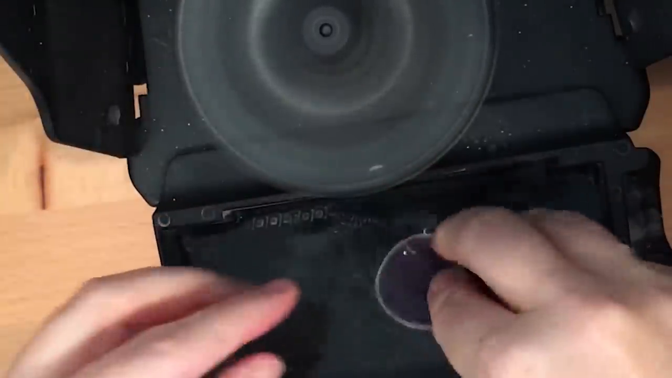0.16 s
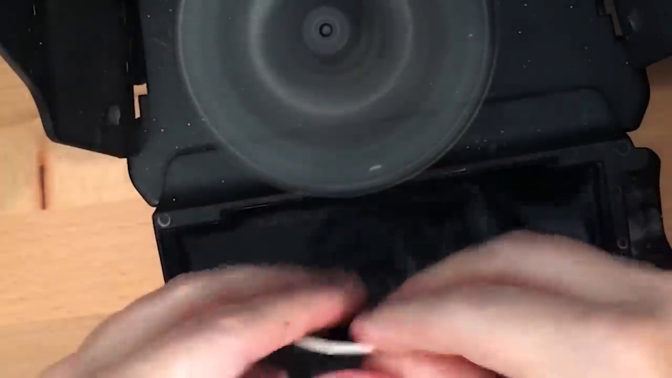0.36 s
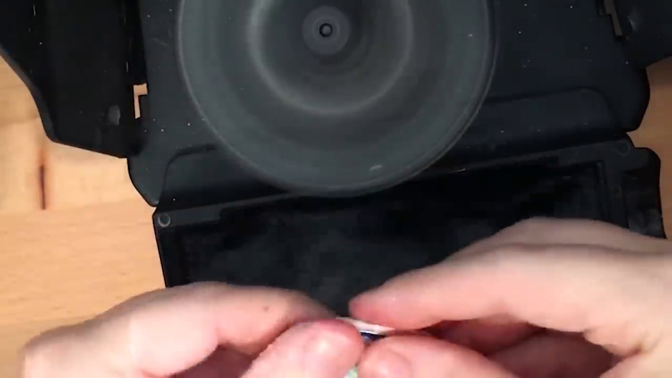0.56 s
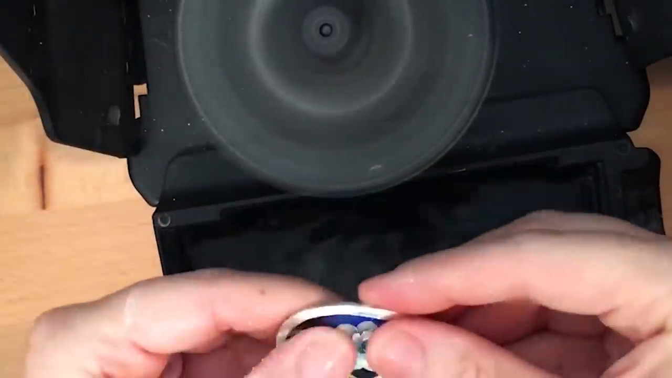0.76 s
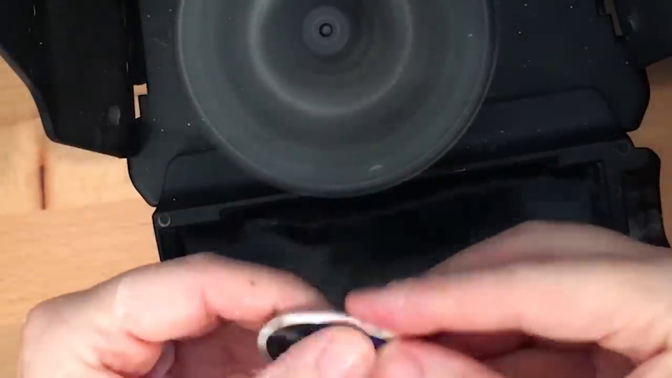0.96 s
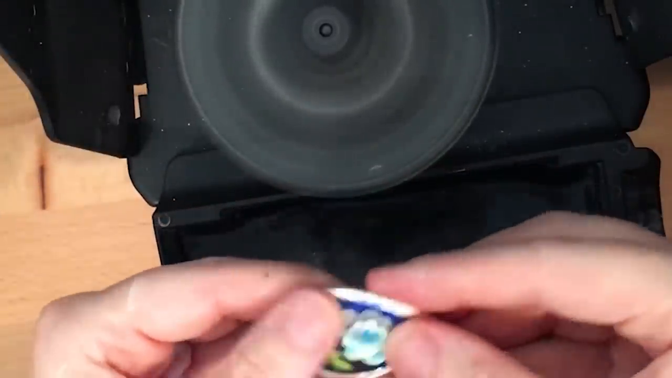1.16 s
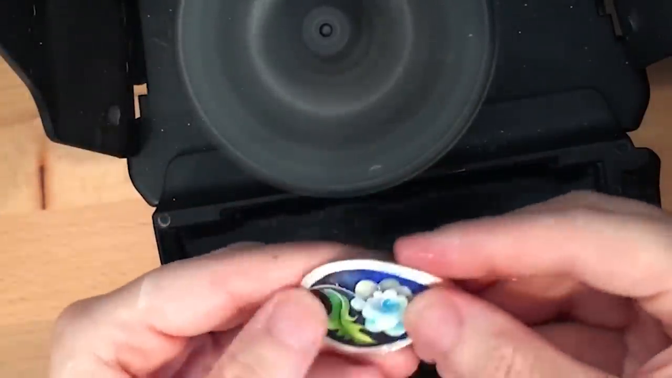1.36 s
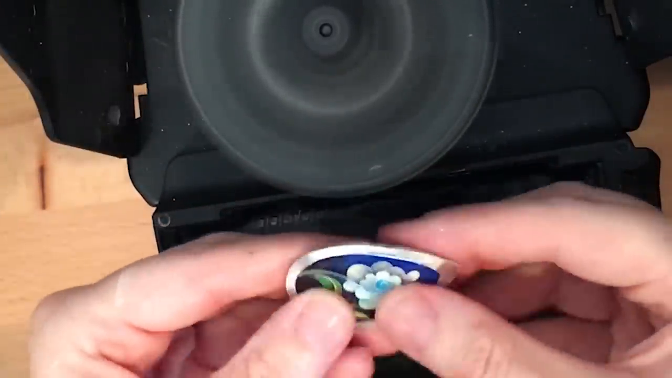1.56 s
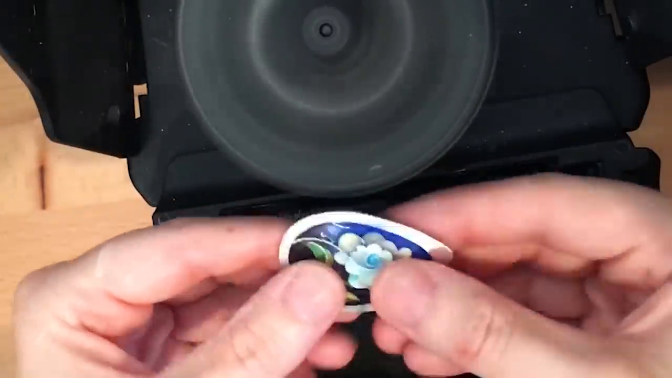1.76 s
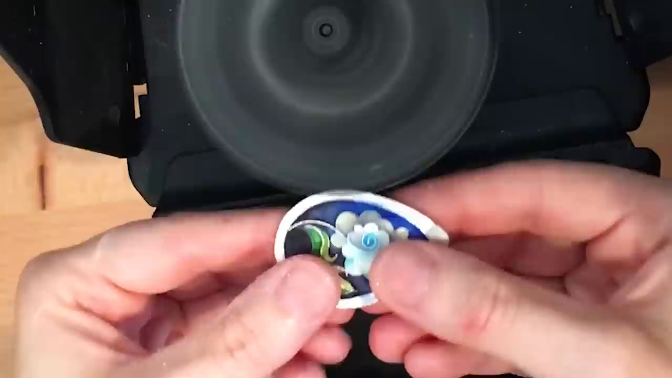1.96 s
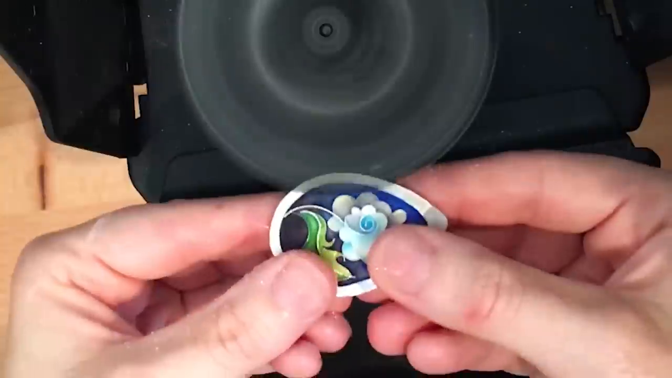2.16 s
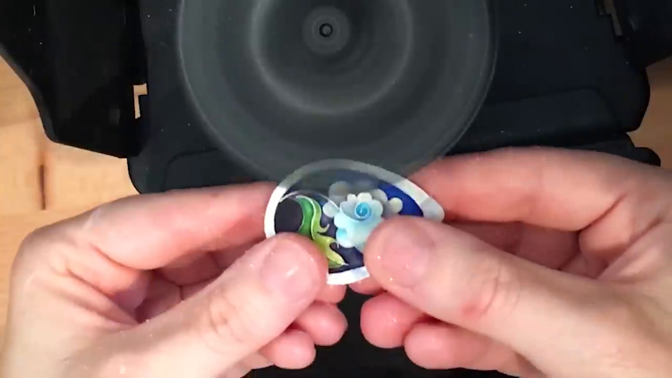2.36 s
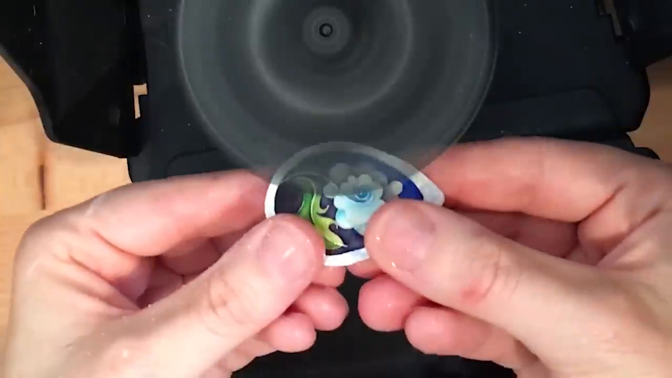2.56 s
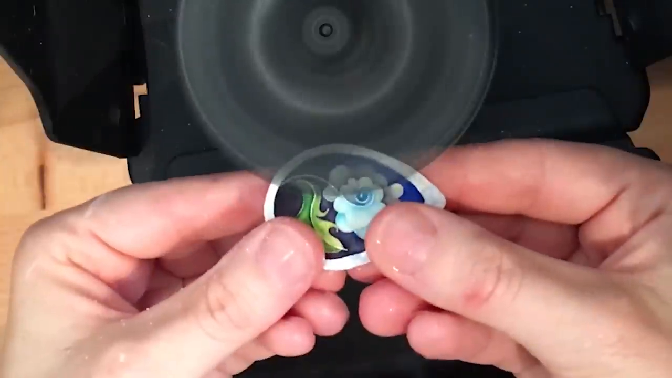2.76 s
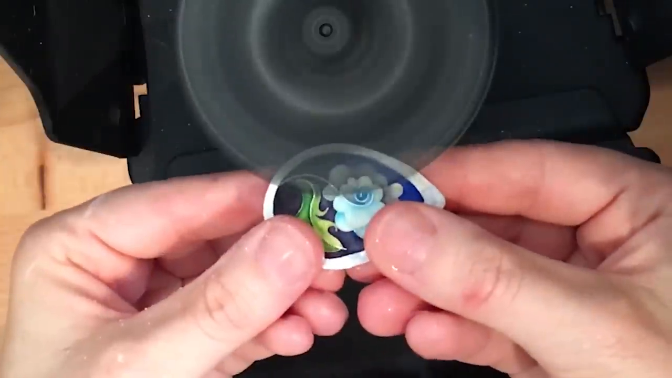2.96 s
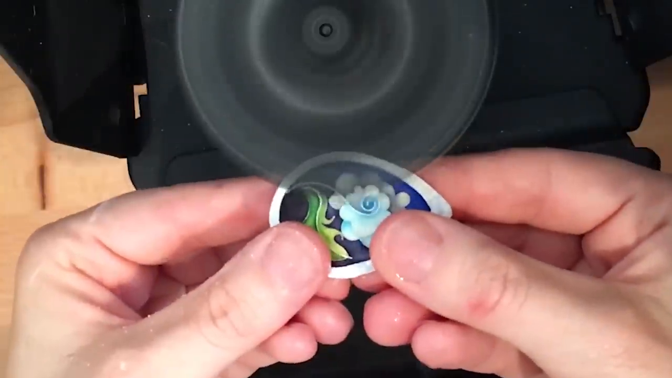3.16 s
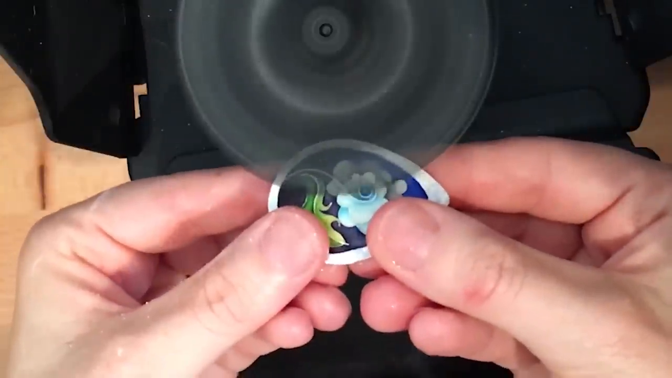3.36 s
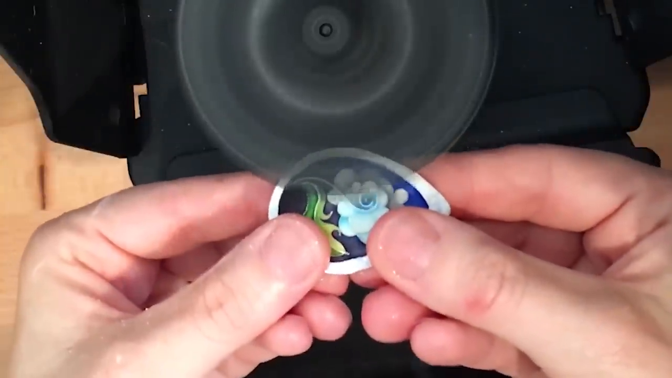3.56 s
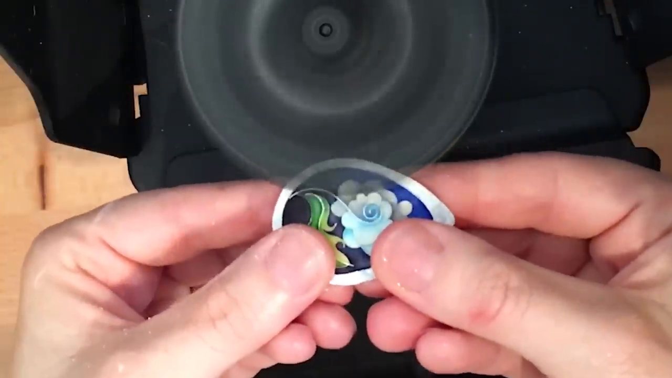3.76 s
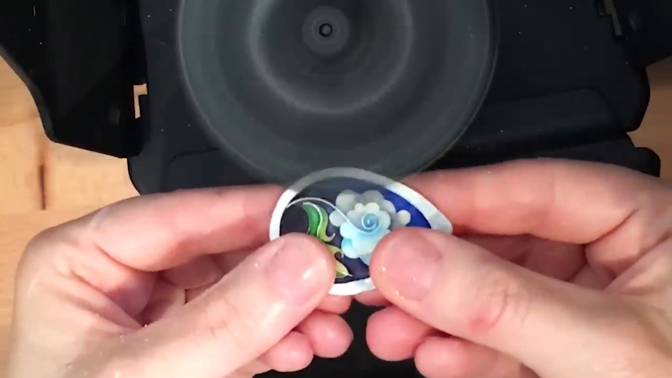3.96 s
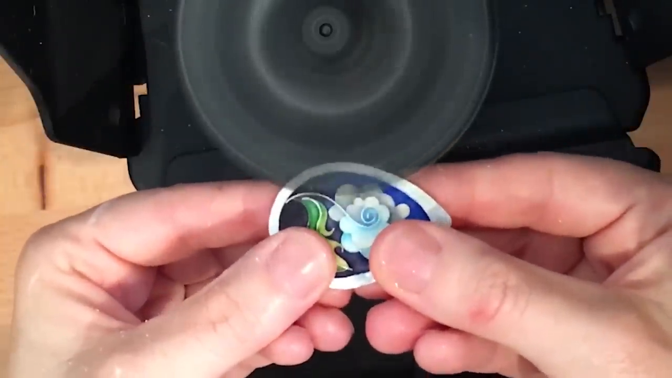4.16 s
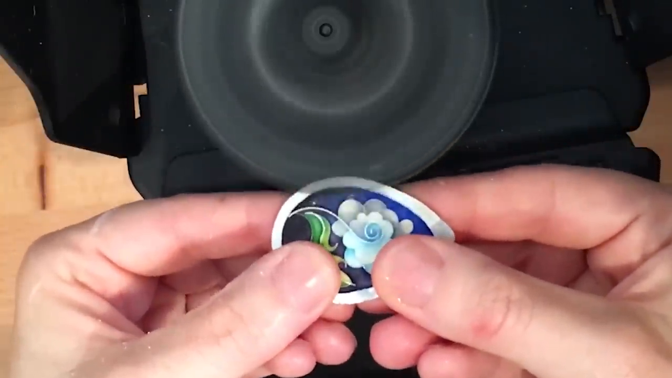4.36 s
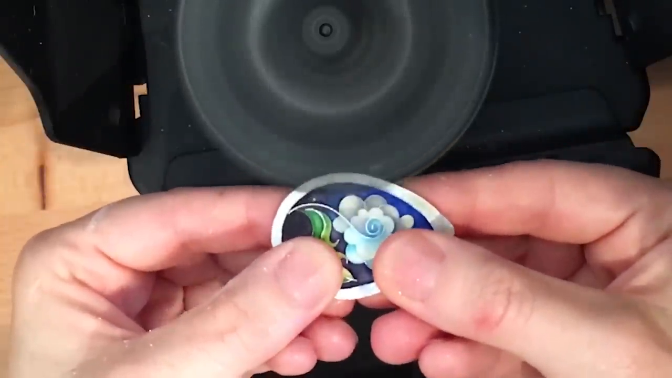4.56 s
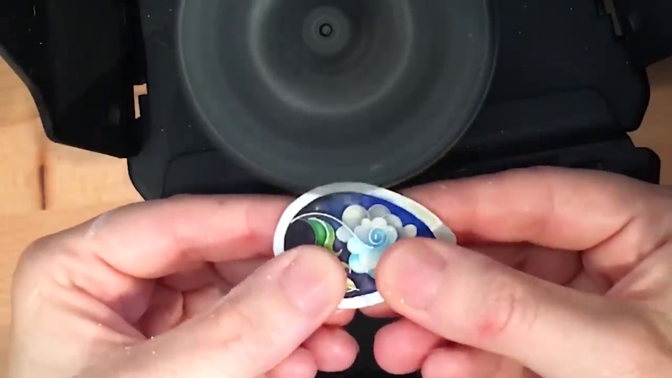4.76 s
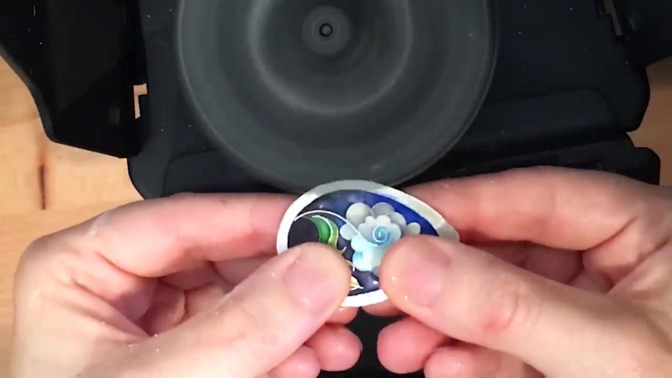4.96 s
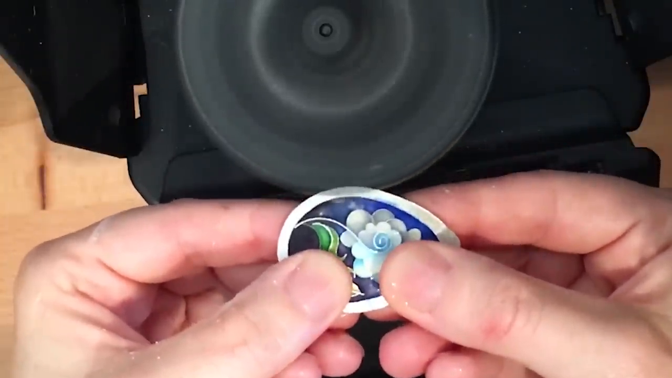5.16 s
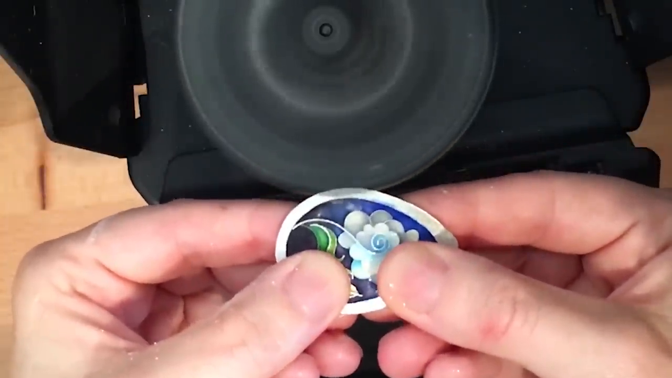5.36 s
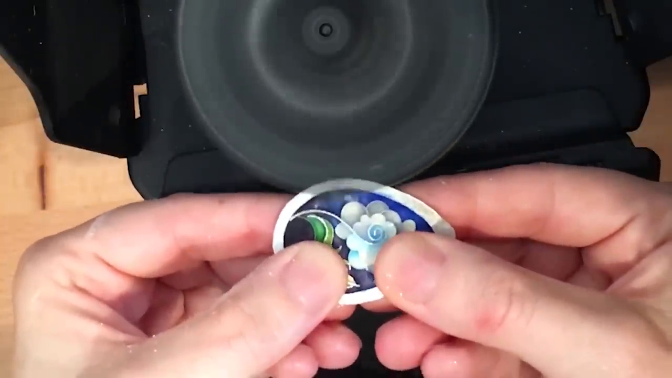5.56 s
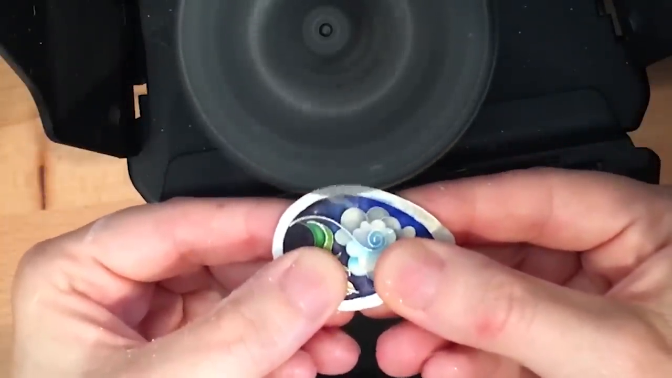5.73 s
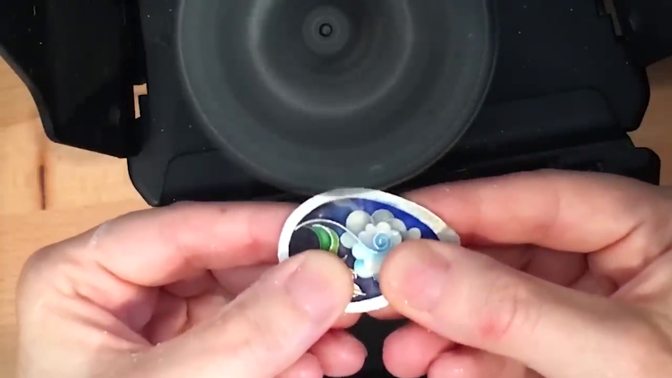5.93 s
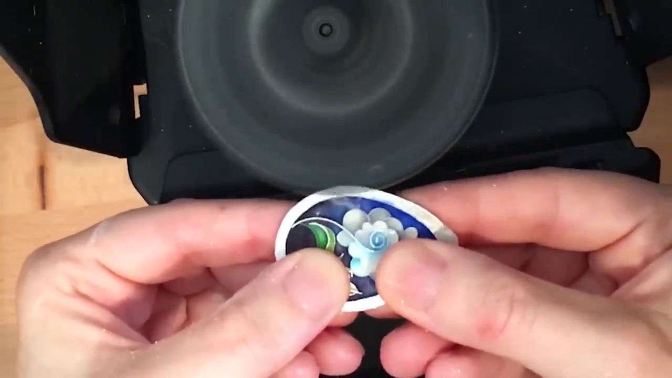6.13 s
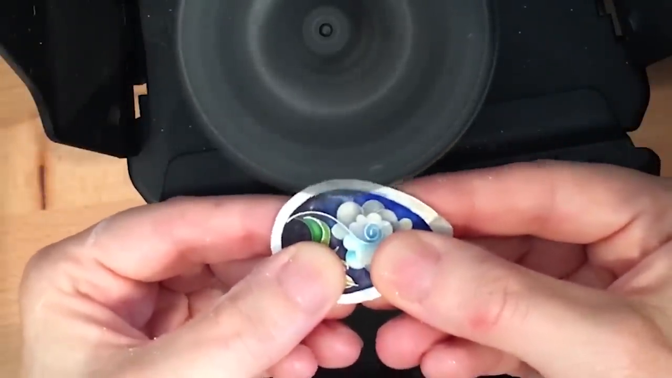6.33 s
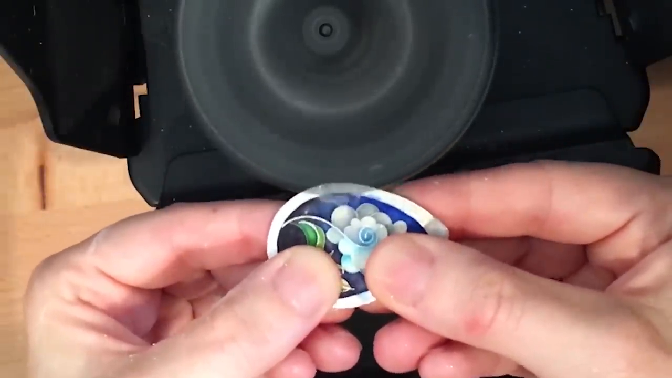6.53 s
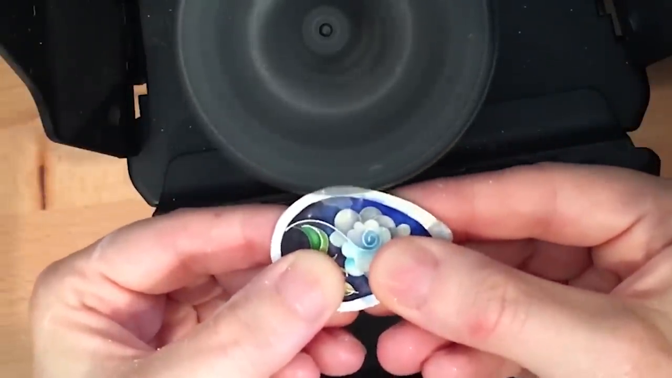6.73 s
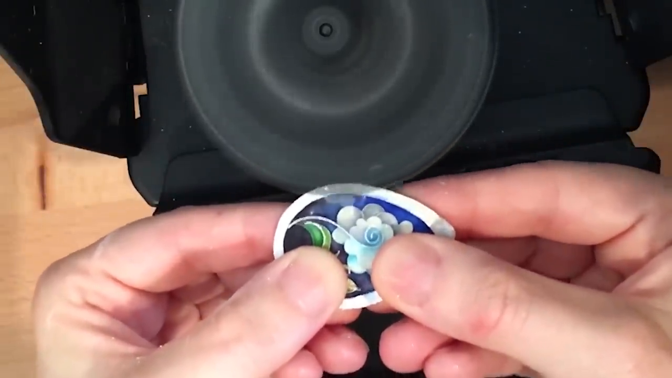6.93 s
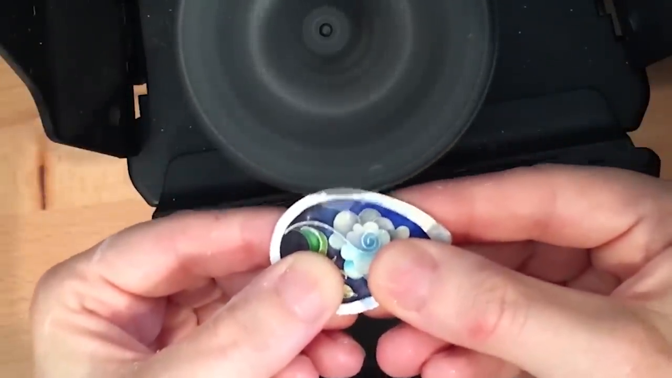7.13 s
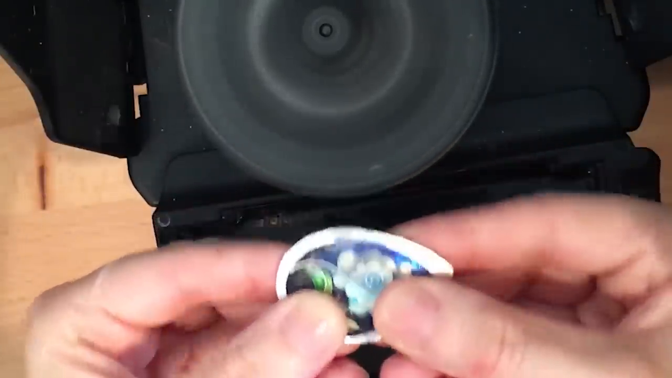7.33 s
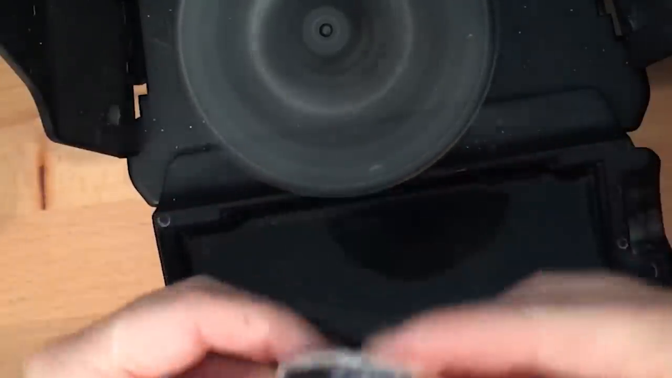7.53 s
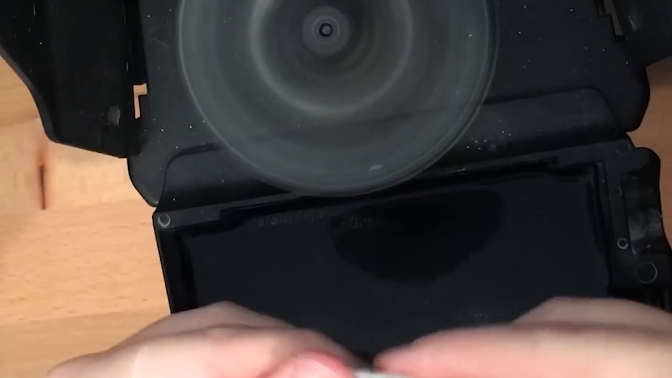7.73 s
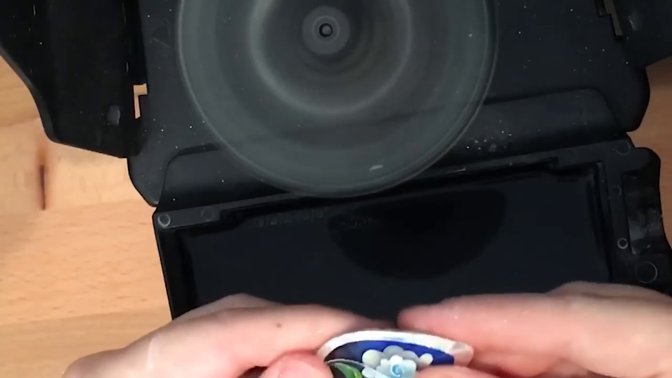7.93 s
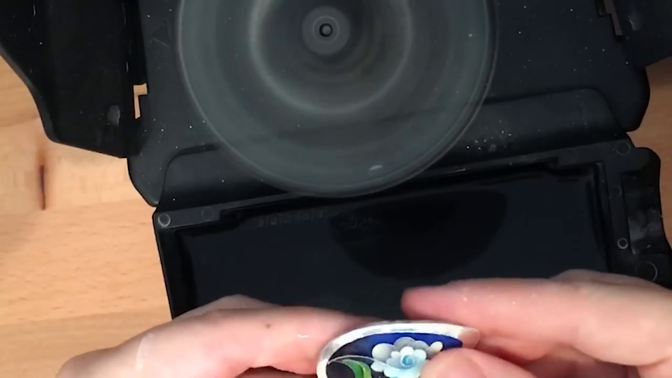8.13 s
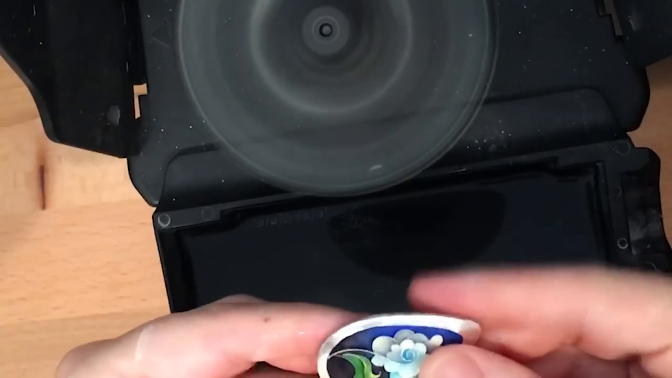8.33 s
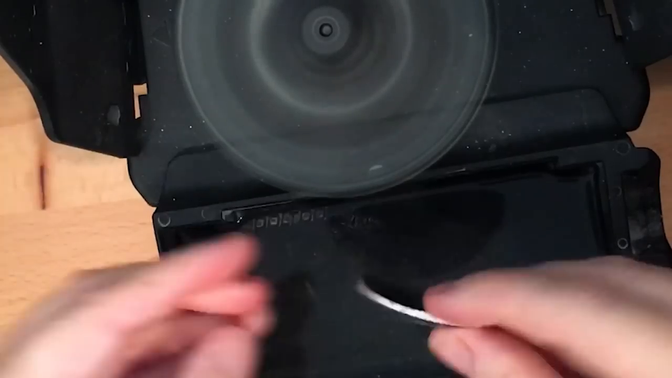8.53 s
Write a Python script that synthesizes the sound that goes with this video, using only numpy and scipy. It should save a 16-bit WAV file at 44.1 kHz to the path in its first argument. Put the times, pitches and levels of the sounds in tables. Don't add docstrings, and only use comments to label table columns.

```python
import sys
import numpy as np
from scipy import signal
from scipy.fft import rfft, irfft
from scipy.io import wavfile
from scipy.ndimage import uniform_filter1d

SR = 44100
rng = np.random.default_rng(int(sys.argv[2]) if len(sys.argv) > 2 else 0)


def volts_from_decibels(level):
    exponent = np.asarray(level, float) / 20
    return 10 ** exponent


def unload_audio(sound):
    columns = np.transpose(np.atleast_2d(sound))
    steps = np.round(np.clip(columns, -1, 1) * 32767)
    wavfile.write(sys.argv[1], SR, steps.astype(np.int16))


N = 378819
TIME = np.arange(N) / SR
IDLE_HZ = 33.24
TOUCH_S, LEAVE_S = 2.808, 7.232
WHITE = np.sqrt(140 * 32.3 / (SR / 2))


def level(x, db):
    return x * volts_from_decibels(db) / np.sqrt(np.mean(x ** 2))


def colour(x, points, peaks=(), peaks_db=0.):
    size = 2 ** 19
    f = np.arange(1, size // 2 + 2) * SR / size
    hz, db = np.transpose(points)
    cepstrum = irfft(np.interp(np.log(f), np.log(hz), db) * np.log(10) / 20, size)
    gain = np.exp(rfft(np.r_[cepstrum[0], 2 * cepstrum[1:size // 2]], size))
    for k, (centre, width, top_db) in enumerate(peaks):
        resonance = width * f / (width * f + 1j * (f ** 2 - centre ** 2))
        gain += (-1) ** k * volts_from_decibels(top_db + peaks_db) * resonance
    return irfft(rfft(x, size) * gain, size)[:N] / np.sqrt(np.mean(np.abs(gain) ** 2))


def walk(rate_hz):
    k = int(SR / rate_hz)
    held = np.repeat(rng.standard_normal(N // k + 1), k)
    return 1.378 * uniform_filter1d(uniform_filter1d(held, k), k)[:N]


def curve(rows):
    s, *columns = np.transpose(rows)
    return [np.interp(TIME, s, c) for c in columns]


def swells(rows):
    s, half_s, *columns = np.array(rows).T[:, :, None]
    coarse = TIME[::64]
    bell = np.exp(-((coarse - s) / half_s) ** 2)
    return [np.interp(TIME, coarse, np.sqrt(np.sum(bell * volts_from_decibels(db) ** 2, axis=0))) for db in columns]


def rim(turns, track, orders, count, spread_db=2.0):
    size = 8 * orders
    heights = volts_from_decibels(spread_db * rng.standard_normal(orders) + 3.3 * rng.standard_normal((count, orders)))
    phase = 2 * np.pi * rng.random(orders) + np.cumsum(rng.standard_normal((count, orders)), axis=0)
    rough = irfft(heights * np.exp(1j * phase) * (np.arange(orders) > 0), size)
    rough /= rough.std()
    row, share = track.astype(int) % (count - 1), track % 1
    cell = (turns % 1 * size).astype(int)
    return (1 - share) * rough[row, cell] + share * rough[row + 1, cell]


def waves(table, turns):
    return sum(volts_from_decibels(db + 3.07 * walk(6.)) * np.sin(2 * np.pi * (k * turns + rng.random())) for k, db in table)


def shaft():
    # time in seconds, loaded speed in turns Hz.
    loaded = [(2.95, 33.0), (3.22, 31.98), (3.38, 32.26), (3.68, 31.65), (3.9, 32.42), (4.33, 32.26),
              (5.05, 32.42), (5.26, 32.2), (5.46, 32.04), (5.65, 32.63), (5.9, 31.45), (6.07, 32.33),
              (6.23, 31.95), (6.42, 32.66), (6.64, 32.18), (6.94, 31.75), (7.07, 32.06), (7.23, 31.8)]
    recover_s, free_hz = .22, 33.29
    hz = curve([(TOUCH_S, IDLE_HZ), *loaded, (LEAVE_S + recover_s, free_hz)])[0]
    change = uniform_filter1d(np.abs(np.gradient(hz)) * SR, size=SR // 8)
    creep, slip_per_hz_s, top = 9.5, 6., 21.
    hz = hz + .09 * walk(9.) * np.clip(IDLE_HZ - hz - .2, 0, 1)
    return hz, np.minimum(creep + slip_per_hz_s * change, top)


def whine(turns):
    # frequency at idle in Hz, level in dB.
    lines = [(629.8, -65.5), (797.8, -62.5), (1030.4, -75.5), (1123, -81), (1163.4, -59.5), (1196.6, -52),
             (1229.9, -64.5), (1263.1, -71.5), (1429.3, -78.5), (1595.5, -75.5), (1994.4, -79.5),
             (3191, -85), (4786.6, -82.5), (4853, -86.5)]
    # time in seconds, gain in dB.
    shade = [
        (.3, 4.5),
        (1, 3),
        (7.3, 0),
        (7.67, 5.5),
    ]
    out = 0
    for hz, db in lines:
        start = np.round(hz / IDLE_HZ) ** 2 / 4
        gain = volts_from_decibels(db + 3.5 + 1.1 * walk(4.3))
        out = out + gain * np.sin(2 * np.pi * (hz / IDLE_HZ * turns + start))
    return out * volts_from_decibels(curve(shade)[0])


def brushes(turns):
    # frequency in Hz, density in dB per Hz.
    bed = [(760, -15), (1300, -6), (1520, 7), (1650, -9.5), (1720, -2), (1930, -5), (2100, -3),
           (2410, -5.5), (3330, -38), (3620, -4), (4800, -19), (7520, -9.5), (8890, -0.5), (10600, 0),
           (15800, -14)]
    # frequency in Hz, width in Hz, level in dB.
    peaks = [(2430, 90, -2), (3750, 40, 0.5), (3950, 60, -8), (4070, 60, -7), (4340, 34, -15),
             (4810, 64, 0), (5530, 70, -12), (8740, 36, -7), (9180, 50, 0.5), (9670, 24, -4),
             (10400, 39, -11), (11730, 82, -18), (12400, 58, -1), (15000, 39, -9)]
    beat = volts_from_decibels(0.85 * rim(turns, 0.58 * TIME, orders=12, count=20))
    repeating = beat * rim(turns, 1.5 * TIME, orders=660, count=20, spread_db=4.)
    chatter = level(repeating + .22 * rng.standard_normal(N), -59.5)
    return colour(chatter, bed, peaks, peaks_db=2.5)


def fan():
    # frequency in Hz, level in dB.
    tones = [(29, -70), (58.2, -53.5), (88, -75), (115, -71.5), (145.4, -55), (174, -73), (285, -62),
             (565, -70), (589, -55.5)]
    out = 0
    for hz, db in tones:
        gain = volts_from_decibels(db + 0.5 + 0.57 * walk(7.2))
        cycles = np.cumsum(hz * (1 + 0.00401 * walk(3))) / SR
        out = out + gain * np.sin(2 * np.pi * cycles)
    return out


def room_air():
    # frequency in Hz, density in dB per Hz.
    rumble = [(24, -17.5), (40, -13), (98, -10.5), (152, -9.5), (212, -18), (279, -10.5), (488, -18.5),
              (613, -9), (692, -23), (793, -15.5), (937, -19.5), (1180, -15.5), (1500, -36), (1950, -48.5),
              (3300, -120)]
    # frequency in Hz, density in dB per Hz.
    sway = [(2, -22), (6, 1), (12, 6), (25, -4.5), (45, -19), (70, -50.5)]
    noise = rng.standard_normal((2, N))
    swelling = colour(noise[0], rumble) * volts_from_decibels(-51 + 0.753 * walk(2.38))
    return swelling + level(colour(noise[1], sway), -42.5)


def tray_knocks():
    # time in seconds, level in dB, push length in seconds.
    knocks = [
        (0.0123, -18.5, 0.0001),
        (0.0155, -14, 0.00026),
        (.036, -36, 0.00054),
    ]
    # frequency in Hz, level in dB, t60 in seconds.
    modes = [(516, -5, 0.13), (628, 3, 0.043), (728, 5.5, 0.065), (887, -3.5, 0.054), (1090, -3, 0.16),
             (1415, 2, 0.028), (1800, -6, 0.041), (2150, -2, 0.025), (2520, -13, 0.05), (2930, -11, 0.036),
             (3800, -18, 0.037), (4670, -23, .03)]
    out, t = np.zeros(N), TIME[:SR // 4]
    ring = 0
    for k, (hz, db, t60_s) in enumerate(modes):
        ring = ring + (-1) ** k * volts_from_decibels(db) * np.sin(2 * np.pi * hz * t) * 1000. ** (-t / t60_s)
    for s, db, push_s in knocks:
        crack = volts_from_decibels(-5.5) * rng.standard_normal(len(t)) * np.exp(-t / 0.0059)
        push = np.hanning(int(push_s * SR) + 3)
        hit = np.convolve(ring + crack, push)[:len(t)]
        out[int(s * SR):][:len(t)] += volts_from_decibels(db) * hit / np.abs(hit).max()
    return out


def tray_drag():
    # middle in seconds, half length in seconds, level in dB.
    slides = [
        (.228, .008, -42),
        (.246, 0.013, -37),
        (.281, 0.014, -41.5),
    ]
    drag = swells(slides)[0]
    hum = np.sqrt(2) * np.sin(2 * np.pi * np.cumsum(630 + 12 * walk(31.0)) / SR)
    rub = drag * volts_from_decibels(-6.0) * rng.standard_normal(N)
    return drag * hum + colour(rub, [(300, -38), (700, 10), (1500, -6), (4000, -23), (8000, -43)])


def ticks():
    # time in seconds, level in dB, frequency in Hz, width in Hz.
    events = [
        (.413, -27, 12500, 5000),
        (.594, -55, 2000, 1000),
        (.666, -53, 1800, 1000),
        (.737, -55, 3500, 2000),
        (7.429, -44, 3800, 1500),
        (7.464, -49, 4070, 2517),
        (7.528, -34, 4200, 1300),
        (7.748, -26, 4200, 2780),
    ]
    out, t = np.zeros(N), TIME[:400]
    for s, db, hz, width_hz in events:
        out[int(s * SR):][:len(t)] += volts_from_decibels(db) * np.sin(2 * np.pi * hz * t) * np.exp(-np.pi * width_hz * t)
    return out


def hand(hz):
    # middle in seconds, half length in seconds, push in dB, bite of the grit in dB.
    strokes = [(2.86, .12, -22.5, -29.5), (3.046, 0.064, -19, -32), (3.185, 0.083, -16, -20),
               (3.296, 0.038, -20.5, -34), (3.444, 0.075, -18, -26), (3.623, 0.083, -15.5, -21),
               (3.717, 0.035, -17, -23), (3.83, 0.13, -17, -30), (4.018, 0.088, -14, -25),
               (4.2, 0.1, -16, -31), (4.388, 0.11, -15, -25.5), (4.656, 0.22, -15, -29.5),
               (4.86, 0.081, -18, -30.5), (5.047, 0.11, -17, -31.5), (5.163, 0.049, -19, -29),
               (5.293, 0.11, -16, -32), (5.466, 0.077, -17, -27), (5.693, 0.092, -16.5, -31),
               (5.869, 0.085, -14, -26), (6.089, 0.048, -16, -30.5), (6.205, 0.066, -13.5, -28),
               (6.405, 0.053, -17, -29), (6.581, 0.1, -13.5, -24.5), (6.807, 0.068, -17.5, -29.5),
               (6.955, 0.12, -16, -29), (7.118, 0.068, -13.5, -27.5), (7.203, 0.027, -25, -29.5)]
    rest_db = (-29, -49.5)
    push, bite = (20 * np.log10(np.hypot(g, volts_from_decibels(db))) for g, db in zip(swells(strokes), rest_db))
    more = push + 16
    sag_hz = IDLE_HZ - hz - 1.
    since_s = np.maximum(TIME - TOUCH_S, 0)
    burr = 2.5 * (1 - np.tanh((TIME - 3.76) / 0.0092)) / 2
    sizzle = -22 + 0.76 * (bite + 27) + burr
    boom = -27.5 + 10.5 * sag_hz + 0.85 * more
    thud = -40 + 7 * sag_hz + 0.95 * more
    lump = 7.5 * np.exp(-np.maximum(TIME - 3.8, 0) / 0.48)
    seat = -13 * np.exp(-(since_s / .22) ** 2)
    fill = -8.5 + more + 1.16 * since_s + seat
    return push, boom - push, bite - push, sizzle - push, thud, lump, fill


def rim_contact(turns, track, fill):
    # place in turns after first touch, decay in turns, drum in dB, scrape in dB, sizzle in dB.
    spots = [(0, .07, -4, -5, -3), (.12, .07, 0, 1, -4), (.24, .05, -6, -8, -8), (.42, .035, -6, -7, -3),
             (.6, .055, 0, -1, 0), (.88, .05, -3, -6, 0)]
    place = turns - np.interp(TOUCH_S, TIME, turns)
    peaks = sum(volts_from_decibels(np.array(db))[:, None] * np.exp(-((place - at) % 1) / decay) for at, decay, *db in spots)
    bumps = volts_from_decibels(3.5 * rim(turns, .4 * track, orders=24, count=100))
    gate = peaks + fill * bumps
    return gate / np.sqrt(uniform_filter1d(gate ** 2, size=2700))


def housing_drum(turns, track, drive, ripple_force):
    # frequency in Hz, density in dB per Hz.
    bed = [(600, -31), (800, -23), (1000, -4.5), (1300, -7), (1600, -13), (2200, -25.5), (2700, -35.5),
           (3400, -50.5), (4500, -62)]
    # frequency in Hz, width in Hz, level in dB.
    modes = [(893.4, 26.3, -2.5), (1098.6, 43.3, 1), (1239, 44.4, -3.5), (1422.6, 13, -6.5),
             (1625, 58, -18)]
    # cycles a turn, level in dB re drum.
    ripples = [(12, -25.5), (16, -22.5), (24, -16.5), (32, -20), (34, -12), (39, -17)]
    rough = WHITE * rim(turns, .7 * track, orders=140, count=150)
    drum = colour(rough * drive, bed, modes, peaks_db=4.0)
    return drum + ripple_force * volts_from_decibels(6.5) * waves(ripples, turns)


def tray_boom(turns, track, drive):
    # frequency in Hz, density in dB per Hz.
    bed = [(350, -51), (480, -18.5), (560, -12), (700, -60), (800, -27), (1000, -54.5)]
    # frequency in Hz, width in Hz, level in dB.
    mode = [(625.4, 16.5, 24.5)]
    rough = WHITE * rim(turns, 1.6 * track, orders=140, count=250)
    return colour(rough * drive * volts_from_decibels(1.2), bed, mode)


def bench_thud(turns, track, thud, lump_db):
    # frequency in Hz, density in dB per Hz.
    bed = [(59, -46), (100, -26.5), (199, -2), (259, 0), (286, -13.5), (381, -1.5), (415, -6.5),
           (480, -5.5), (620, -20.5), (1060, -120)]
    # cycles a turn, level in dB re thud.
    lobes = [(4, -13.5), (5, -8), (6, -15), (7, -4.5), (8, -1)]
    rough = WHITE * rim(turns, .5 * track, orders=140, count=100)
    return colour(rough * thud * volts_from_decibels(lump_db - 1.0), bed) + volts_from_decibels(-3.0) * thud * waves(lobes, turns)


def grit(turns, track):
    grains = volts_from_decibels(4.76 * rim(turns, .5 * track, orders=70, count=100) - 0.42)
    return rng.standard_normal(N) * grains


def scrape(turns, track, drive):
    # frequency in Hz, density in dB per Hz.
    bed = [(1760, -37.5), (3000, -7.5), (3190, -58), (3280, -41.5), (3530, 3), (3640, 5), (4200, -1.5),
           (4440, -1.5), (5030, -1.5), (5450, 0.5), (6310, 6), (7400, -7.5), (9620, -29.5), (16300, -120)]
    # frequency in Hz, width in Hz, level in dB.
    piece = [(2157, 187, 7), (3850, 217, -31), (4400, 35, 12), (5550, 320, 6), (6430, 170, 2.5),
             (6660, 100, 7.5)]
    return colour(grit(turns, track) * drive, bed, piece, peaks_db=-4.0)


def grit_sizzle(turns, track, drive):
    # frequency in Hz, density in dB per Hz.
    bed = [(5000, -18.5), (7200, -15), (7500, -8.5), (9000, -0.5), (9900, -4), (10800, 4), (12000, -3),
           (13000, -6.5), (14500, -4.5), (15700, -8.5)]
    # frequency in Hz, width in Hz, level in dB.
    peaks = [(9350, 110, -9.5), (11000, 350, -10.5)]
    return colour(grit(turns, track) * drive, bed, peaks, peaks_db=3.5)


def snags(turns):
    # first catch in seconds, number of turns, frequency in Hz, width in Hz, level in dB.
    catches = [(2.81, 7, 3750, 500, -13), (2.8105, 7, 5700, 1000, -13), (2.8115, 7, 2100, 450, -20),
               (2.8355, 6, 11200, 900, -4), (2.8265, 6, 5400, 1100, -12), (2.8265, 5, 8800, 1000, -9.5),
               (3.183, 4, 5300, 600, -10), (3.21, 2, 3730, 540, -17), (3.555, 1, 5200, 800, -11),
               (3.617, 1, 5000, 800, -10), (3.932, 14, 3720, 400, -19), (5.131, 6, 5800, 700, -11.5),
               (5.409, 1, 6000, 770, -6), (5.417, 1, 3900, 1200, -8), (5.439, 3, 11500, 1200, -7),
               (5.717, 2, 11800, 1000, -9), (5.835, 1, 4500, 1500, -9), (5.868, 4, 5800, 800, -13),
               (5.9, 1, 3900, 900, -11), (7.0, 1, 5600, 500, -13), (7.113, 1, 4850, 600, -9)]
    out, t = np.zeros(N), TIME[:600]
    for s, repeats, hz, width_hz, db in catches:
        angles = turns[int(s * SR)] + np.arange(round(repeats))
        for at in np.searchsorted(turns, angles):
            ring = np.sin(2 * np.pi * hz * t) * np.exp(-width_hz * t) * (1 - np.exp(-t / 0.000064))
            rough = 1 + 0.13 * rng.standard_normal(len(t))
            out[at:at + len(t)] += volts_from_decibels(db + 2.0 * rng.standard_normal()) * ring * rough
    return out


def grinding(turns, track, controls):
    drum_db, boom_db, scrape_db, sizzle_db, thud_db, lump_db, fill_db = controls
    fill = volts_from_decibels(fill_db)
    drum_gate, scrape_gate, sizzle_gate = rim_contact(turns, track, fill)
    touch = (TIME > TOUCH_S) * np.exp(-np.maximum(TIME - LEAVE_S, 0) / 0.0041)
    force = touch * volts_from_decibels(drum_db)
    out = housing_drum(turns, track, drum_gate ** 0.89 * force, force * fill)
    out += tray_boom(turns, track, force * volts_from_decibels(boom_db))
    out += bench_thud(turns, track, touch * volts_from_decibels(thud_db), lump_db)
    out += scrape(turns, track, scrape_gate * force * volts_from_decibels(scrape_db))
    out += grit_sizzle(turns, track, sizzle_gate * force * volts_from_decibels(sizzle_db))
    return out + snags(turns)


def room(x):
    t60_s, treble_t60_s, room_db = 0.77, 0.42, -17.5
    t = TIME[:SR // 2]
    noise = rng.standard_normal(len(t))
    low = signal.sosfilt(signal.butter(2, 4500., fs=SR, output="sos"), noise)
    tail = low * 1000. ** (-t / t60_s) + (noise - low) * 1000. ** (-t / treble_t60_s)
    tail *= 1 - np.exp(-t / 0.002)
    return signal.fftconvolve(x, level(tail, room_db) / np.sqrt(len(t)))[:N]


def scene():
    hz, slide = shaft()
    turns, track = np.cumsum(hz) / SR, np.cumsum(slide) / SR
    background = whine(turns) + brushes(turns) + fan() + room_air()
    handling = tray_knocks() + tray_drag() + ticks()
    near = handling + grinding(turns, track, hand(hz))
    return (near + room(near) + background)[None]


def low_pass(x):
    return signal.sosfilt(signal.butter(12, 16970, fs=SR, output="sos"), x)


def record(dry):
    cut = signal.ellip(12, .2, 60, 15700, fs=SR, output="sos")
    round_off = .56 * np.tanh(signal.sosfilt(cut, dry) / .56)
    mix = signal.sosfilt(cut, round_off)
    return low_pass(mix)


dry = scene()
out = record(dry)
unload_audio(out)
```